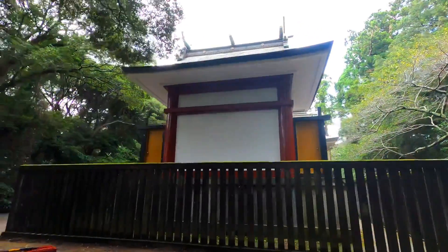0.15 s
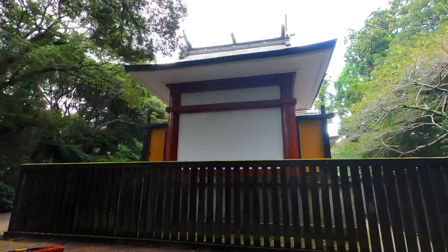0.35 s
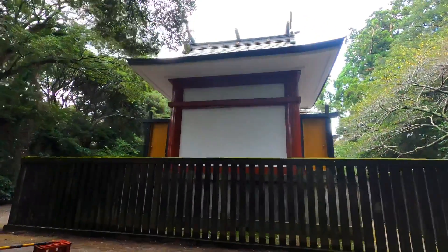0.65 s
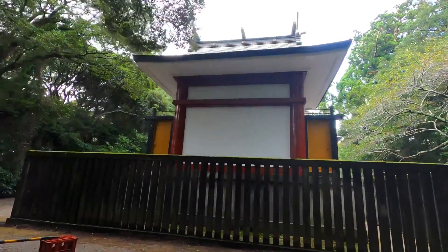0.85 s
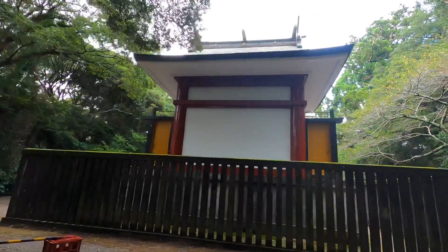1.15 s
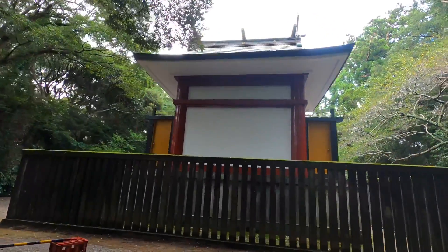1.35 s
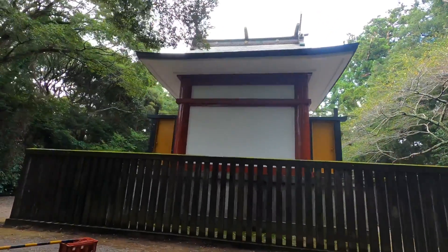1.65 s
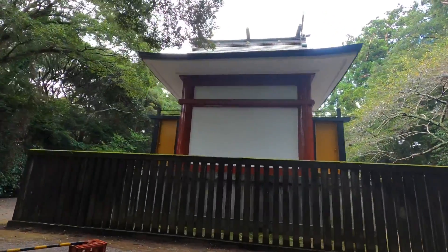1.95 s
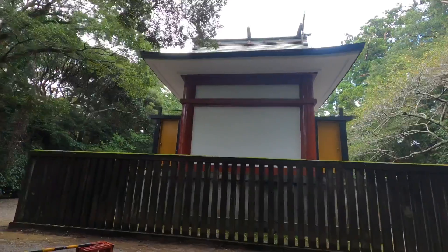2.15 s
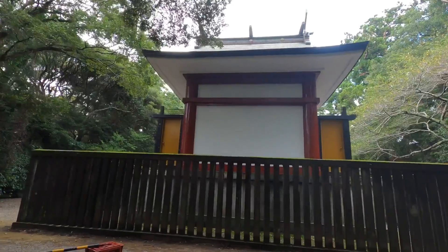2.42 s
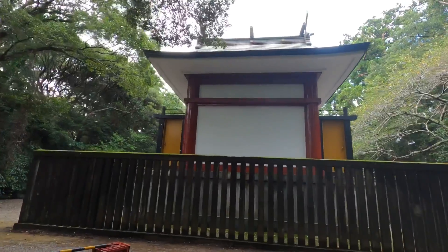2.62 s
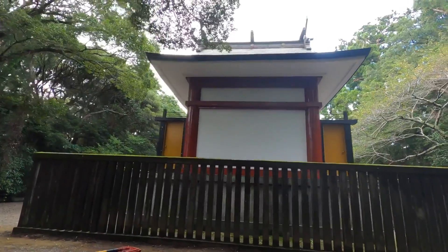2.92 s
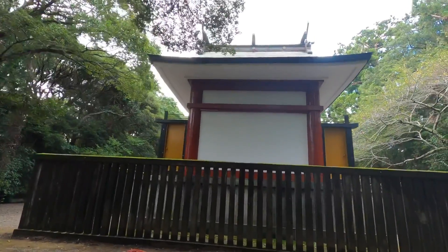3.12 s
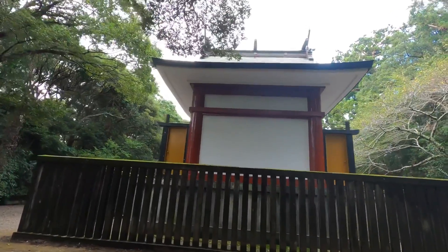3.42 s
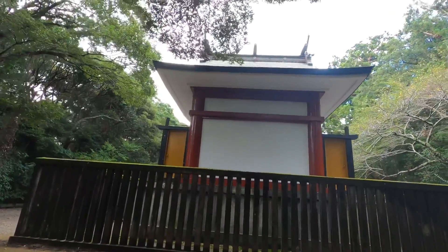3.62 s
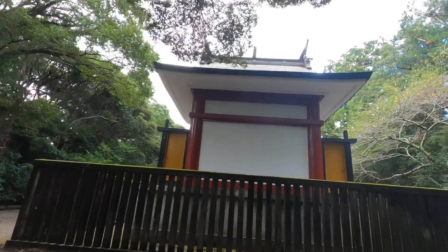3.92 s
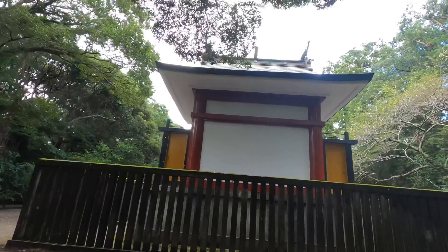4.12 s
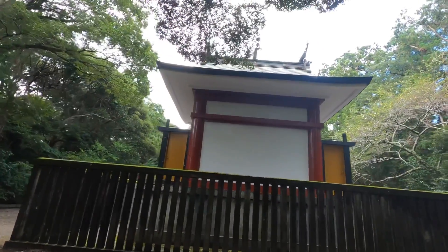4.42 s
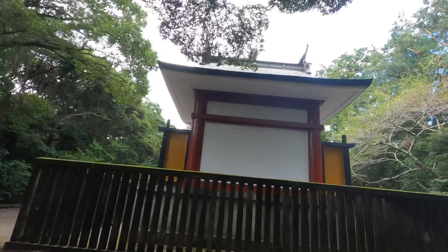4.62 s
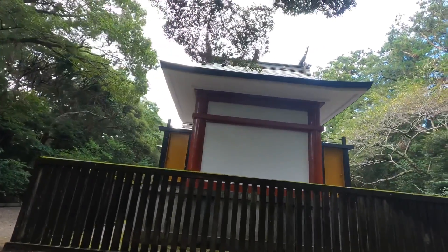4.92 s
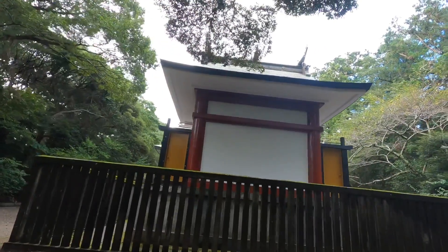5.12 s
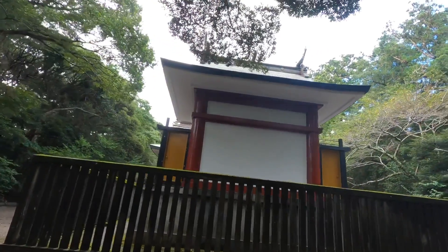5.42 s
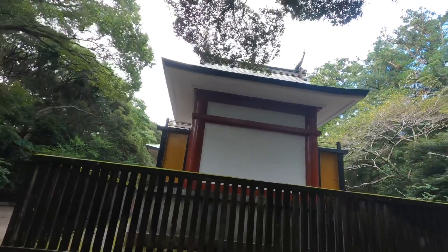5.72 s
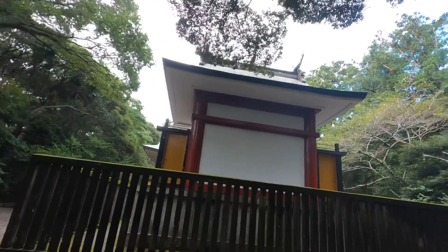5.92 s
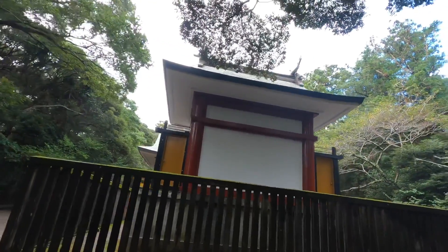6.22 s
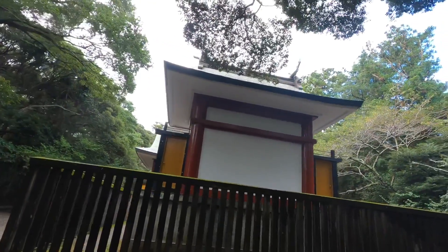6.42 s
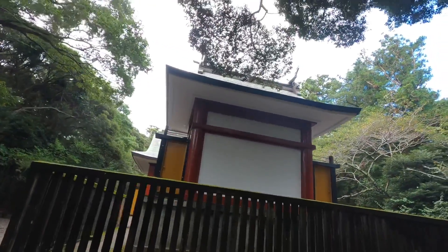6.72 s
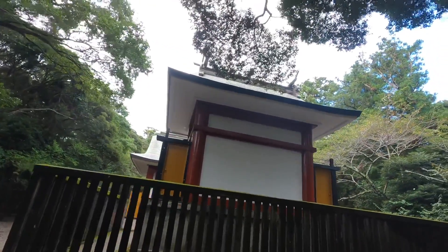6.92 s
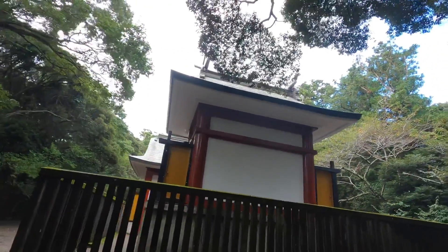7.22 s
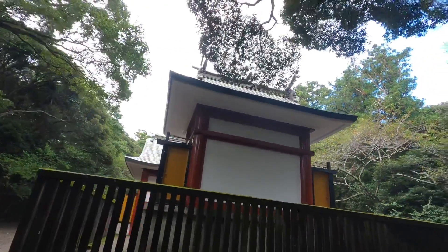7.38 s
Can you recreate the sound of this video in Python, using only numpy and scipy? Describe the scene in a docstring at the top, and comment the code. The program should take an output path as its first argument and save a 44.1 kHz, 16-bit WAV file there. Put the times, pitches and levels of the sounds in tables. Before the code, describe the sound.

Outdoors beside a wooden fence and a shrine building among trees, a hand-held microphone moves with slow steps on gravel. Small stones crackle and knock underfoot. A cicada repeats a rasping tone that glides up and hooks sharply at the end, often followed by high buzzing. A distant insect chorus, leafy hiss and low handling rumble continue throughout, with brief low thumps just after three seconds and past five.

```python
"""Slow footsteps press into gravel among summer trees, heard by a hand-held camera.
From the start there is coloured noise for leaves and far traffic, low swings for the camera's shake, and a
pulsed noise buzz over a far chorus. Resonant clicks crackle under the first step, then a cicada's gliding
tone rasps upward, again and again. Thin gliding whistles enter before one second; just after three seconds,
and once past five, short low swings thump the microphone."""
import sys
import numpy as np
from scipy import signal
from scipy.fft import rfft, irfft
from scipy.io import wavfile
from scipy.ndimage import uniform_filter1d

SR = 44100
rng = np.random.default_rng(int(sys.argv[2]) if len(sys.argv) > 2 else 0)


def digitize_waveform(pressure):
    """Quantize a signal to 16-bit integers and store it at the path in sys.argv[1].

    Rows of a 2-D input are taken as channels; values are limited to [-1, 1].
    """
    field = np.atleast_2d(pressure).T
    bounded = np.clip(field, -1, 1)
    quanta = np.round(bounded * 32767).astype(np.int16)
    wavfile.write(sys.argv[1], SR, quanta)


def makeup_ratio(level_db):
    """Linear amplitude ratio for a level in decibels (20 dB per factor of ten)."""
    decades = np.asarray(level_db, float) / 20
    return 10 ** decades


N = 332955
T = np.arange(N) / SR  # [s]

# colour of leaves, traffic and hiss: (frequency [Hz], relative density [dB per Hz])
AIR_COLOUR = [(26, -16), (45, -10.5), (56, -20), (81, -15), (279, -24.5), (500, -31.5), (1130, -32),
              (1400, -34), (2230, -42), (3640, -48), (5050, -39), (6690, -64), (10700, -66), (12000, -42.5),
              (15600, -73), (22000, -120)]
# faint low hum, before its waver: (time [s], level [dB])
HUM_LEVEL = [(0, -75.5), (1.1, -73.5), (1.6, -73.5), (2.5, -67), (2.8, -80), (4.4, -71), (4.65, -73),
             (5.0, -76.5), (5.6, -72.5), (7.55, -79)]
# slow swing of the camera in the hand, before its waver: (time [s], level [dB])
SLOW_SHAKE = [(0, -40), (.2, -38), (.5, -29.5), (1.03, -36.5), (1.24, -30.5), (1.5, -29), (1.69, -38),
              (1.77, -37), (1.95, -40), (2.12, -26.5), (2.3, -32), (2.42, -39.5), (2.7, -36.5), (3.0, -29),
              (3.38, -37), (3.48, -38.5), (3.7, -31.5), (4.0, -42), (4.2, -37), (4.5, -34.5), (4.95, -40.5),
              (5.25, -32.5), (5.56, -41), (5.8, -32), (6.33, -31.5), (6.55, -41), (6.72, -29.5),
              (6.88, -29.5), (7.1, -31.5), (7.25, -36), (7.55, -30.5)]
# quick jolts of the camera: (time [s], level [dB], rise and fall time [s])
CAMERA_JOLTS = [(0.173, -45, 0.03), (0.357, -42, 0.087), (1.028, -40.5, 0.045), (1.255, -46, 0.046),
                (1.69, -55, 0.035), (1.997, -42, 0.074), (2.283, -40, .06), (2.43, -46, 0.076),
                (2.596, -47, 0.12), (2.805, -41, 0.092), (3.081, -34, 0.029), (3.328, -44, 0.089),
                (3.537, -46.5, 0.066), (3.804, -44, 0.13), (4.26, -45, 0.041), (4.513, -39.5, 0.068),
                (4.713, -42, 0.032), (4.9, -45.5, .1), (5.37, -41, 0.1), (5.688, -43, .06),
                (6.344, -61, .06), (6.75, -59, .08), (7.384, -50, 0.058)]
# swells of the far chorus: (time [s], middle level [dB], upper level [dB])
CHORUS_SWELLS = [(0.0, -62, -66), (0.4, -57.5, -66.5), (0.8, -58.5, -67), (1.14, -60, -68),
                 (1.89, -59, -67.5), (2.1, -58, -67.5), (2.33, -58.5, -66), (3.09, -59.5, -66.5),
                 (3.47, -58, -64.5), (4.25, -59.5, -66.5), (4.58, -57, -63.5), (5.38, -58.5, -65),
                 (5.91, -57, -64.5), (6.08, -59.5, -66), (6.5, -58, -65.5), (7.17, -55, -63),
                 (7.55, -60, -66)]
# colour of the high buzz: (frequency [Hz], relative density [dB per Hz])
BUZZ_COLOUR = [(7000, -30), (9000, -15), (11200, -11), (12500, -5), (13500, -1), (14600, 0), (15700, -2),
               (15800, -60)]
# colour of the chorus's middle range: (frequency [Hz], relative density [dB per Hz])
MIDDLE_COLOUR = [(820, -57), (1400, -9.5), (1800, -2.5), (2520, 0), (3100, -2), (3650, 1.5), (5000, -13),
                 (6500, -79), (11000, -120)]
# colour of the chorus's upper range: (frequency [Hz], relative density [dB per Hz])
UPPER_COLOUR = [(2710, -9), (4600, -16.5), (5150, -3), (6720, -1.5), (11000, -12), (14300, -38),
                (22000, -120)]
# bursts of high buzz, the strong ones just after a rasp: (start [s], time to release [s], level [dB])
BUZZ_BURSTS = [(.5, 0.2, -69), (0.848, 0.21, -64), (1.41, 0.34, -70.5), (2.185, 0.23, -65), (2.5, 0.2, -70),
               (3.02, 0.3, -71), (3.508, 0.25, -64.5), (4.12, 0.19, -70), (4.76, 0.21, -63.5),
               (5.3, .55, -69.5), (5.95, 0.16, -62.5), (7.143, 0.17, -63)]
# steady buzz under the bursts: (time [s], level [dB])
STEADY_BUZZ = [(0, -74), (2.0, -74), (2.9, -71), (3.9, -68), (4.6, -68.5), (5.1, -68), (6.3, -67.5),
               (6.9, -69), (7.1, -70), (7.55, -66)]
# heel and toe roll weight onto the gravel: (time of most weight [s], crunch level [dB], press [s], release [s])
FOOTSTEPS = [(.12, -64.5, .05, 0.019), (.31, -63.5, 0.051, 0.044), (.44, -62, 0.063, .04),
             (1.11, -61, .06, 0.033), (1.19, -60.5, 0.033, .08), (1.99, -62.5, 0.11, .05),
             (2.78, -59.5, 0.065, 0.057), (2.87, -58.5, 0.061, 0.076), (3.72, -59.5, .12, 0.033),
             (4.29, -57.5, .04, 0.13), (4.49, -60.5, 0.078, 0.087), (5.25, -60, 0.16, 0.13),
             (5.88, -58.5, 0.033, 0.05), (5.97, -53, 0.036, 0.056), (6.6, -57, 0.044, 0.053),
             (6.74, -60, 0.077, 0.063), (6.88, -63, .05, 0.13), (7.35, -59, 0.059, .02),
             (7.42, -54.5, 0.035, .03), (7.48, -62.5, .03, 0.071)]
# stone sizes, each filtered twice: (resonance [Hz], width of one filter [Hz], relative level [dB])
STONE_SIZES = [(535, 410, -1.5), (738, 420, -1.5), (993, 340, 3.5), (1170, 164, 0), (2100, 2400, -0.5)]
# single stones that slip; the knock peaks about 10.6 dB under its level: (time [s], level [dB], ring [Hz])
SLIPPING_STONES = [(0.11, -60, 810), (0.429, -36.5, 980), (1.992, -47, 883), (2.767, -45, 1260),
                   (2.883, -30.5, 1170), (2.913, -37.5, 1170), (4.277, -51, 1110), (4.301, -39, 1130),
                   (4.333, -50, 1130), (4.457, -50, 910), (5.249, -55, 1170), (5.881, -46, 1148),
                   (5.961, -34, 1000), (5.984, -38, 1040), (7.413, -32, 1150)]
# rasps of the cicada: (end [s], base level [dB], time stretch [ratio], pitch [ratio],
# overtones against the tone [dB], added level of the final hook [dB])
CICADA_RASPS = [(.485, -72, 0.93, 1.0, -2, -7), (0.83, -59.5, .8, 1.04, 0, -10.5),
                (1.502, -72, 1.01, 0.97, -3, -6), (2.172, -60.5, 1.1, 1.01, .5, -7),
                (3.49, -62.5, 0.9, 0.98, 2.5, -5), (4.757, -63, .8, 1.02, 0, -5.5),
                (5.41, -71, .8, 1.03, -2, -8), (5.927, -63.5, 0.86, .97, 1.5, -5.5),
                (6.405, -70.5, .8, 1.05, 0, -5.5), (7.117, -61.5, 0.83, 0.97, 1.0, -7.5)]
# one rasp before stretch and pitch ratio: (time from its end [s], pitch [Hz], level over base [dB])
RASP_GLIDE = [(-.34, 1384, -26), (-.24, 1500, -12), (-.12, 1660, -3.5), (-.05, 1784, 3), (-.03, 2000, 10.5),
              (-.014, 2650, 9.5), (0, 3250, -8)]
# resonance of the hollow body: (frequency [Hz], gain [dB])
HOLLOW_BODY = [(1300, -1), (2000, -3), (2800, 7.5), (3600, 9), (4500, 2.5), (6500, -12), (9000, -21)]
# colour of the rasp's hiss: (frequency [Hz], relative density [dB per Hz])
HISS_COLOUR = [(2500, -12), (4000, -3), (6500, 2.5), (8000, -11.5), (11000, -34), (15000, -70)]
# faint thin whistles, before wobble and waver: (start [s], length [s], first pitch [Hz], last pitch [Hz],
# peak level [dB])
THIN_WHISTLES = [(.81, .07, 3650, 3850, -61), (.89, 0.09, 3880, 3930, -62), (.99, 0.045, 3970, 4000, -60),
                 (2.249, 0.15, 3850, 3980, -65), (4.82, .11, 3700, 3720, -63),
                 (4.92, 0.29, 2510, 2800, -62.5), (5.34, .07, 3650, 4450, -65),
                 (6.065, 0.045, 3780, 3770, -59), (6.28, .08, 3780, 3780, -63),
                 (7.23, .125, 2490, 2680, -59), (7.21, 0.12, 3740, 4350, -58)]
# puffs on the microphone: (time [s], envelope peak [dB], pitch at that time [Hz], half-width of the bell [s])
MIC_PUFFS = [(3.0615, -31.5, 122.5, 0.0085), (3.0875, -36.5, 120, 0.0085), (3.1355, -36.5, 116, 0.0085),
             (3.1805, -40, 131, 0.013), (3.205, -37.5, 108, 0.0061), (5.256, -31.5, 123.7, 0.0092)]


def unit(x):
    """Scale to an rms of one."""
    return x / np.sqrt(np.mean(np.abs(x) ** 2))


def noise():
    """White noise."""
    return rng.standard_normal(N)


def curves(table):
    """Draw the columns of a table sample by sample."""
    s, *columns = np.transpose(table)
    return [np.interp(T, s, column) for column in columns]


def colour(x, points):
    """Filter by (Hz, dB) points, joined along a logarithmic frequency axis."""
    hz, db = np.transpose(points)
    f = np.maximum(np.arange(N // 2 + 1) * SR / N, 1e-3)
    gain = makeup_ratio(np.interp(np.log(f), np.log(hz), db))
    return irfft(rfft(x) * gain, N)


def ring(x, hz, width_hz):
    """One resonance, gain 1 at its centre."""
    return signal.lfilter(*signal.iirpeak(hz, hz / width_hz, fs=SR), x)


def walk(rate):
    """Slow chance with a spread of one: noise averaged twice over 1 / rate seconds."""
    k = int(SR / rate)
    return unit(uniform_filter1d(uniform_filter1d(noise(), k), k))


def grit(rate, spread_db):
    """Random clicks at a mean rate per second, most small and a few large."""
    hits = rng.random(N) < rate / SR
    return hits * noise() * makeup_ratio(spread_db * rng.exponential(size=N))


def bumps(rows, bed_db):
    """Level of bell-shaped swells (s, dB, rise s, fall s) over a bed; powers add."""
    power = makeup_ratio(bed_db) ** 2
    for s, db, rise, fall in rows:
        width = np.where(T < s, rise, fall)
        power = power + makeup_ratio(db) ** 2 * np.exp(-2 * ((T - s) / width) ** 2)
    return np.sqrt(power)


def air():
    """Leaves, far traffic and microphone hiss as coloured noise, with a narrow low hum."""
    wash = unit(colour(noise(), AIR_COLOUR)) * makeup_ratio(0.5 * walk(1))
    hum = unit(ring(ring(noise(), 281.0, 32.0), 281.0, 32.0))
    hum_level = makeup_ratio(curves(HUM_LEVEL)[0] + 2.0 * walk(3.2))
    return makeup_ratio(-59.5) * wash + hum_level * hum


def shake():
    """Two loose swings of hand and camera, whose rates wander, over a slower sway."""
    slow_hz = 14.5 * (1 + 0.1 * walk(5))
    quick_hz = 29.5 * (1 + 0.08 * walk(5))
    sway = 0.3 * unit(ring(noise(), 7.0, 6.0))
    slow = np.sin(2 * np.pi * np.cumsum(slow_hz) / SR) + sway
    quick = np.sin(2 * np.pi * np.cumsum(quick_hz) / SR)
    slow_level = makeup_ratio(curves(SLOW_SHAKE)[0] + 0.83 * walk(23.4))
    # a faint quick tremor stays between the jolts
    quick_level = bumps([(s, db, length, length) for s, db, length in CAMERA_JOLTS], bed_db=-67)
    both = np.sqrt(2) * (slow_level * slow + quick_level * quick)
    return signal.sosfiltfilt(signal.butter(8, 38.0, fs=SR, output="sos"), both)


def buzz_level():
    """Bursts that swell and die away over the steady buzz; powers add."""
    attack_s, release_s = 0.017, 0.081
    power = makeup_ratio(curves(STEADY_BUZZ)[0]) ** 2
    for s, length, db in BUZZ_BURSTS:
        swell = (T - s) / attack_s
        fade = (s + length - T) / release_s + 1
        power = power + makeup_ratio(db) ** 2 * np.clip(np.minimum(swell, fade), 0, 1) ** 2
    return np.sqrt(power)


def chorus():
    """Near and far cicadas: pulsed noise buzzes in the treble, clicks and noise wash together below."""
    middle_db, upper_db = curves(CHORUS_SWELLS)
    beat_hz = 135 * (1 + 0.14 * walk(7.9))
    beat = np.cumsum(beat_hz) / SR % 1  # place within each pulse, 0 to 1
    pulses = noise() * (2.0 + np.exp(-beat / 0.13))
    buzz = colour(pulses, BUZZ_COLOUR) * makeup_ratio(0.77 * walk(16))
    middle = colour(grit(rate=9000.0, spread_db=1.0), MIDDLE_COLOUR) * makeup_ratio(0.64 * walk(42))
    upper = colour(noise(), UPPER_COLOUR) * makeup_ratio(0.6 * walk(5))
    return buzz_level() * unit(buzz) + makeup_ratio(middle_db) * unit(middle) + makeup_ratio(upper_db) * unit(upper)


def gravel():
    """Stones of several sizes grind under the sole, each size crackling on its own; a few slip and knock."""
    bed = np.zeros(N)
    for hz, width_hz, db in STONE_SIZES:
        clicks = grit(rate=1200.0, spread_db=1.46)
        bed += makeup_ratio(db) * unit(ring(ring(clicks, hz, width_hz), hz, width_hz))
    # the bed level is gravel settling between the steps; the crunch flutters by 1 dB
    out = unit(bed) * bumps(FOOTSTEPS, bed_db=-66) * makeup_ratio(1 * walk(31))
    t = T[:SR // 20]
    knock = t / 0.0023 * np.exp(1 - t / 0.0018)
    for s, db, hz in SLIPPING_STONES:
        i = int(s * SR)
        out[i:i + len(t)] += makeup_ratio(db - 8.5) * np.sin(2 * np.pi * hz * t) * knock
    return out


def blurred_tone(phase, rough, blur):
    """A tone whose strength and phase stray at random, so that its line smears."""
    return np.real(np.exp(1j * phase) * (1 + rough * (walk(blur) + 1j * walk(blur))))


def rasps():
    """The drumming membrane speeds up into a gliding tone with blurred overtones, shaped by the hollow body."""
    when, pitch, shape_db = np.transpose(RASP_GLIDE)
    hz, level, over = np.full(N, pitch[0]), np.zeros(N), np.zeros(N)
    for end, db, pace, ratio, over_db, hook_db in CICADA_RASPS:
        on = (T > end + pace * when[0]) & (T < end)
        hz[on] = ratio * np.interp(T[on] - end, pace * when, pitch)
        hooked_db = shape_db + hook_db * (pitch > pitch[3])
        level[on] = makeup_ratio(db + np.interp(T[on] - end, pace * when, hooked_db))
        over[on] = makeup_ratio(over_db)
    phase = 2 * np.pi * np.cumsum(hz) / SR
    blur = 260.0
    tone = blurred_tone(phase, 1.3, blur)
    # uneven beats smear the higher overtones more
    overtones = np.zeros(N)
    for k in range(2, 5):
        treble_loss = np.clip((5200 - k * hz) / 900, 0.15, 1)
        overtones += blurred_tone(k * phase, 1.0, blur * k ** 2) / k * treble_loss
    near = colour(level * (tone + over * overtones), HOLLOW_BODY)
    # the rasp also hisses in the treble, less sharply timed than the tone
    hiss = uniform_filter1d(level, size=SR // 16) * noise()
    near = near + makeup_ratio(3.5) * colour(hiss, HISS_COLOUR)
    # trunks and fence scatter it back
    t = T[:SR // 3]
    scatter = rng.standard_normal(len(t)) * np.exp(-t / 0.04)
    return near + makeup_ratio(-37) * signal.fftconvolve(near, scatter)[:N]


def whistles():
    """Short broken tones far off glide in pitch, blurred by the leaves in level and pitch."""
    out = np.zeros(N)
    waver = makeup_ratio(2.2 * walk(70))
    wobble_hz = 32 * walk(120)
    for s, length, first_hz, last_hz, db in THIN_WHISTLES:
        u = np.clip((T - s) / length, 0, 1)
        hz = first_hz + (last_hz - first_hz) * u ** 3 + wobble_hz
        envelope = np.sqrt(np.abs(np.sin(np.pi * u))) * (u < 1)
        out += makeup_ratio(db) * envelope * np.sin(2 * np.pi * np.cumsum(hz) / SR)
    return out * waver


def puffs():
    """Each puff rocks the diaphragm for two or three swings that slow down."""
    out, sag = np.zeros(N), 700.0  # sag of the swing: the pitch falls by twice this [Hz per s]
    for s, db, hz, length in MIC_PUFFS:
        t = T - s
        swing = np.sin(2 * np.pi * (hz - sag * t) * t - 1.3)
        out += makeup_ratio(db) * np.exp(-(t / length) ** 2) * swing
    return out


def scene():
    """All sources, in one channel."""
    mix = air() + shake() + chorus() + gravel() + rasps() + whistles() + puffs()
    return mix[None]


def top_cut(x):
    """Nothing passes above the cut-off."""
    return signal.sosfilt(signal.butter(12, 16360, fs=SR, output="sos"), x)


def record(dry):
    """The finished mix as the camera keeps it."""
    return top_cut(dry)


dry = scene()
out = record(dry)
digitize_waveform(out)
```